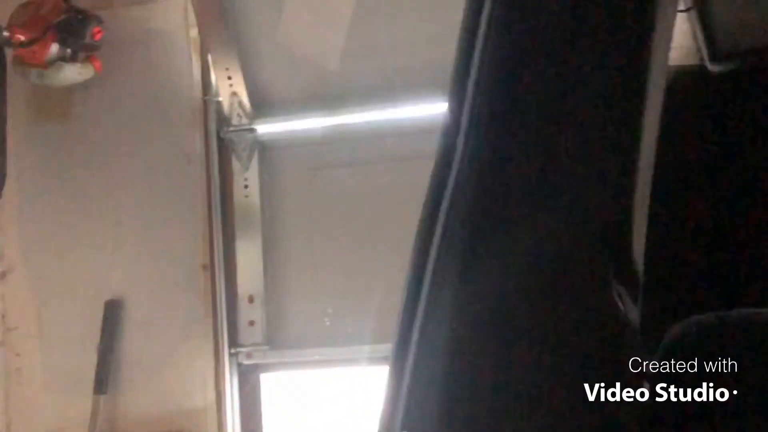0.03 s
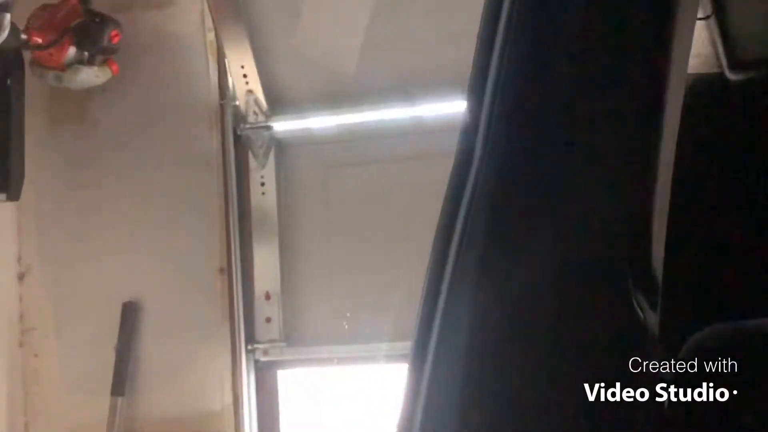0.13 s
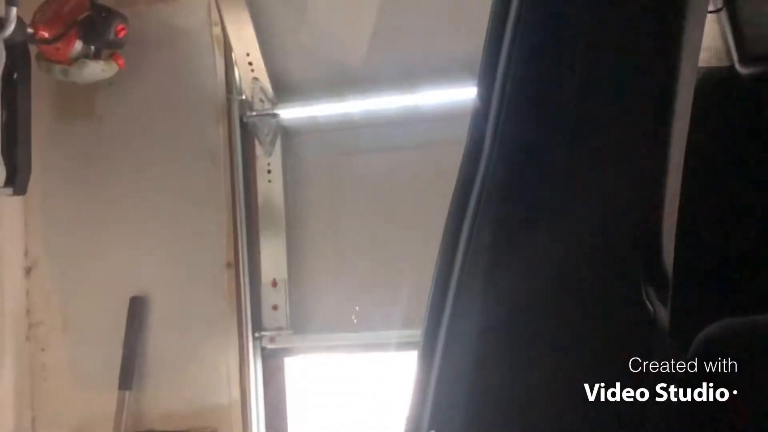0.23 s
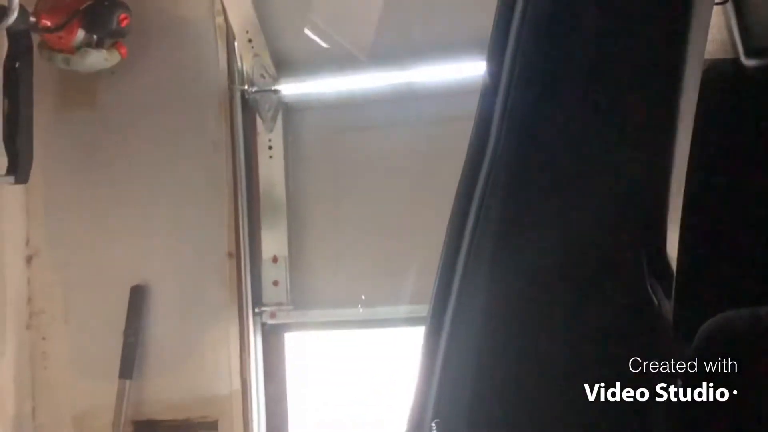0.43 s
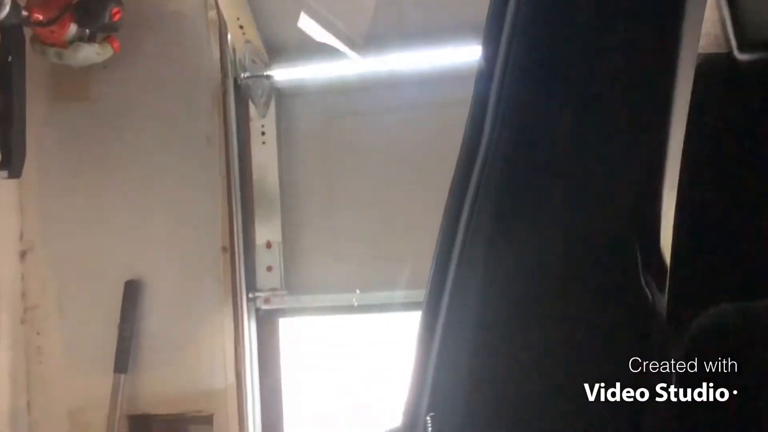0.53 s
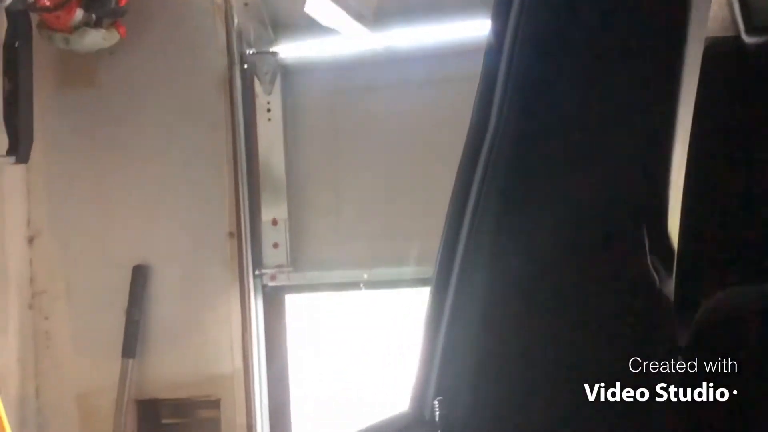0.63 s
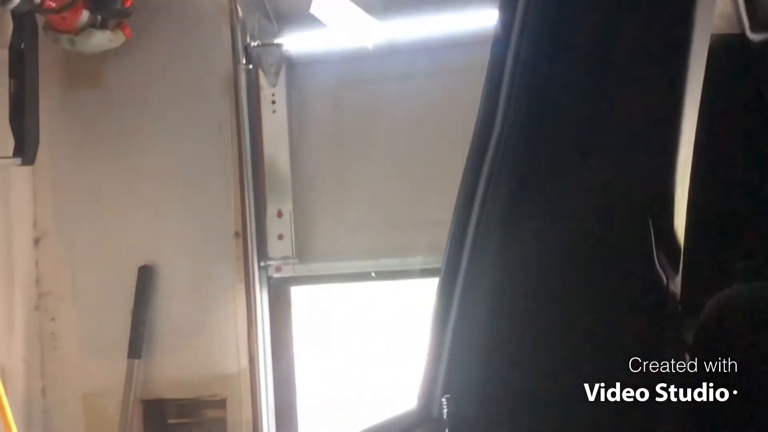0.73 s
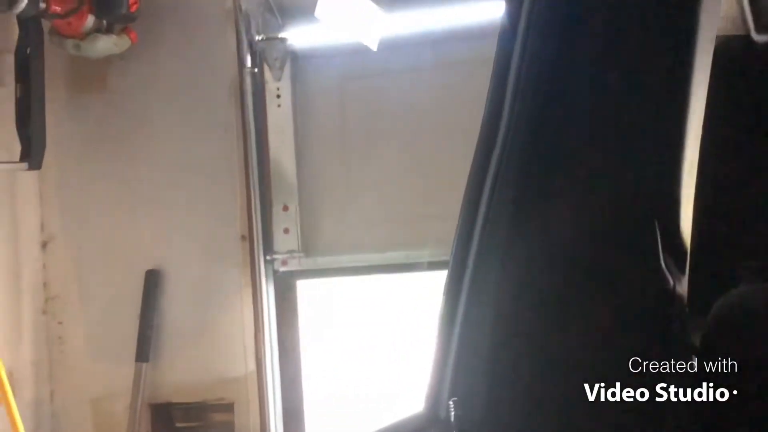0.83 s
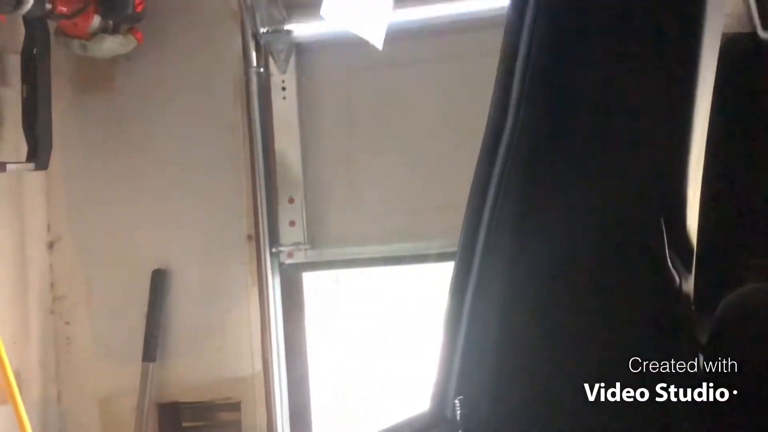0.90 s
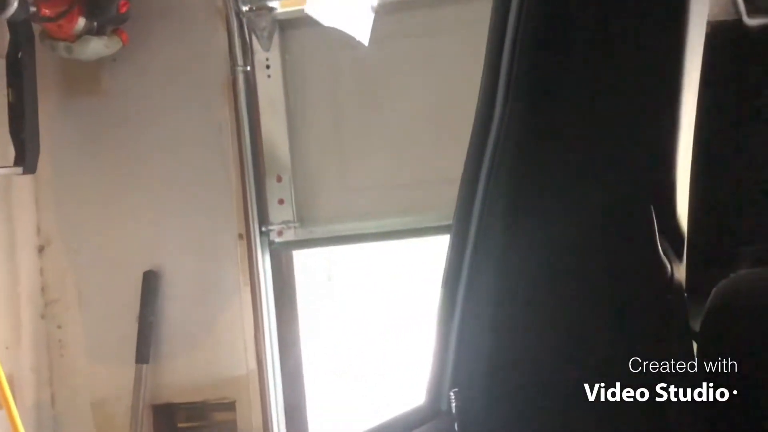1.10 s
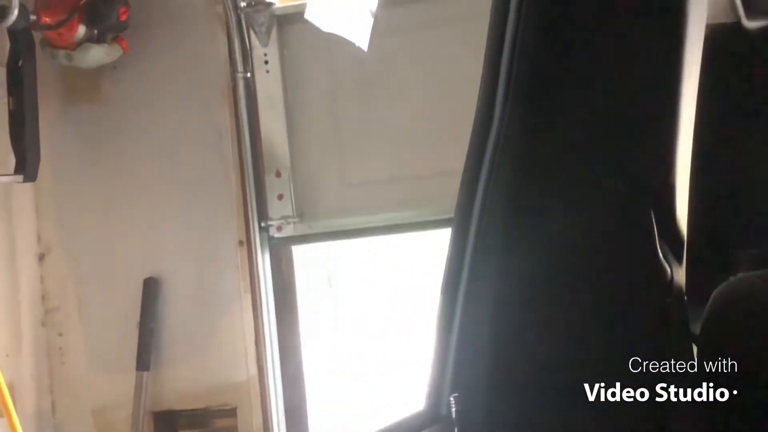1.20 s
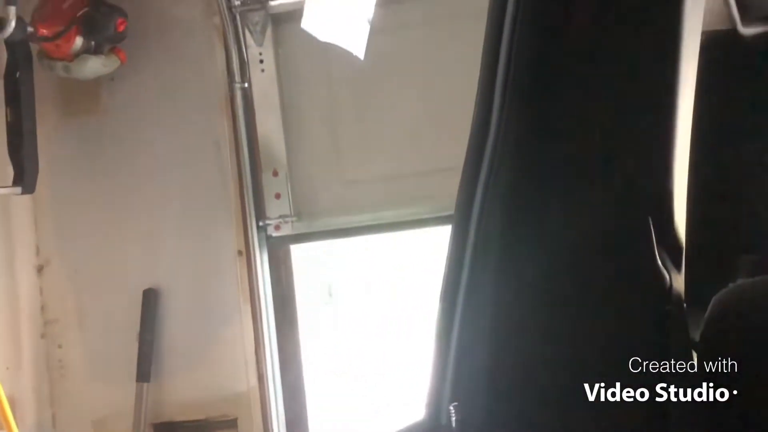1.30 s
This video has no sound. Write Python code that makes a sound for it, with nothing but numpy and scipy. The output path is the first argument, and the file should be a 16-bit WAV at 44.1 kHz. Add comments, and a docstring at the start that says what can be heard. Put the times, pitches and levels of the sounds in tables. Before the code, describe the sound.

A soft, hollow bump on a door panel comes at about 0.2 seconds, with a short scrape and a low boom that fades by 0.5 seconds. Faint scuffs and cloth rustles of someone shifting run until about 1.2 seconds, with two very faint, thin squeaks in the first 0.4 seconds. Two small taps land near 1.3 seconds. A quiet low rumble and even hiss fill the garage throughout.

```python
"""Low rumble and an even hiss in a quiet garage. One soft bump, with a short scrape of contact,
sets a hollow panel, perhaps a door, booming in a few quickly fading swells while its modes ring out.
Someone shifts: faint friction scuffs, cloth rustles and two thin stick-slip squeaks, with low room
resonances stirred by the movement. Two small taps come at the end."""
import sys
import numpy as np
from scipy import signal
from scipy.fft import irfft
from scipy.io import wavfile

SR = 44100
rng = np.random.default_rng(int(sys.argv[2]) if len(sys.argv) > 2 else 0)


def int16_out(signal):
    """Quantize to a 16-bit WAV file."""
    q = np.round(np.clip(np.atleast_2d(signal).T, -1, 1) * 32767)
    wavfile.write(sys.argv[1], SR, q.astype(np.int16))


N = 59535
T = np.arange(N) / SR
HZ = np.fft.rfftfreq(N, 1 / SR) + 1  # +1 keeps the log finite


def amp(db):
    """Decibels to gain."""
    return 10 ** (np.asarray(db) / 20)


def unit_rms(x):
    """Scale to rms 1."""
    return x / np.sqrt(np.mean(x ** 2) + 1e-20)


def spectrum_db(colour):
    """Join (freq_hz, relative_db) points on a log-frequency axis."""
    freq_hz, relative_db = np.transpose(colour)
    return np.interp(np.log(HZ), np.log(freq_hz), relative_db)


def noise(shape_db):
    """Random-phase noise of rms 1 with the given spectral shape."""
    phases = np.exp(2j * np.pi * rng.random(len(HZ)))
    return unit_rms(irfft(amp(shape_db) * phases, N))


def wander(rate_hz):
    """Random drift of rms 1, low-passed at rate_hz."""
    return noise(-10 * np.log10(1 + (HZ / rate_hz) ** 6))


def envelope(start_s, length_s, rise_s, decay_s):
    """Linear rise, hold, exponential decay."""
    rise = np.clip((T - start_s) / rise_s, 0, 1)
    return rise * np.exp(-np.maximum(T - start_s - length_s, 0) / decay_s)


def friction(strokes, colour, rise_s, decay_s, grain_db):
    """Strokes of rubbing noise, each with its own brightness; grain_db sets the level flutter."""
    out = np.zeros(N)
    for start_s, length_s, level_db, tilt_db_per_oct in strokes:
        hiss = noise(spectrum_db(colour) + tilt_db_per_oct * np.log2(HZ))
        grainy = unit_rms(hiss * amp(grain_db * wander(rate_hz=120)))
        out += amp(level_db) * envelope(start_s, length_s, rise_s, decay_s) * grainy
    return out


def room_tone():
    """Steady low murmur and hiss of the room."""
    # room spectrum: freq_hz, relative_db
    colour = [(22, -32.5), (45, -3), (68, -4.5), (110, 3), (190, 1), (290, -7), (400, -7.5), (540, -16),
              (800, -22.5), (1200, -25.5), (2000, -32), (2700, -31.5), (3300, -30.5), (4500, -33.5),
              (7000, -35), (15000, -39)]
    return amp(-60) * noise(spectrum_db(colour))


def rumble():
    """A deep tone that wavers in pitch and level."""
    # rumble contour: time_s, relative_db
    contour = [(0.0, -61), (0.326, -69), (0.398, -55.5), (0.54, -70.5), (0.586, -62), (0.634, -72),
               (0.702, -64), (0.804, -87), (0.98, -58.5), (1.35, -79)]
    pitch_hz = 47.04 + 4 * wander(rate_hz=9.5)
    level_db = np.interp(T, *np.transpose(contour)) - 4
    cycles = np.cumsum(pitch_hz) / SR
    return amp(level_db) * unit_rms(np.sin(2 * np.pi * cycles))


def room_resonances():
    """Low, slightly unsteady room resonances, stirred by movement, swell and die away."""
    # resonances: start_s, length_s, level_db, pitch_hz
    resonances = [(0, 0.034, -57.5, 183), (.372, 0.065, -50, 173.6), (.54, 0.024, -57.5, 175),
                  (0.549, 0.1, -64, 388.8), (.71, 0.069, -55, 184.7), (.85, 0.037, -64, 187),
                  (1.061, 0.047, -59.5, 199.6)]
    out = np.zeros(N)
    for start_s, length_s, level_db, pitch_hz in resonances:
        phase_rad = 2 * np.pi * pitch_hz * (T - start_s) + 0.35 * wander(rate_hz=30)
        swell = envelope(start_s, length_s, rise_s=0.0064, decay_s=0.02)
        out += amp(level_db) * swell * np.sin(phase_rad)
    return out


def rustles():
    """Cloth rubs lightly as someone shifts."""
    # cloth strokes: start_s, length_s, level_db, tilt_db_per_oct
    strokes = [(.04, 0.027, -70.5, -6.5), (.25, 0.12, -87, -5.5), (.542, 0.089, -83, -4),
               (.668, 0.018, -76, -2), (.845, 0.031, -81.5, 2), (.955, .02, -77, -5),
               (1.01, 0.028, -105, -7)]
    # cloth spectrum before tilt: freq_hz, relative_db
    colour = [(100, -36), (1500, -12), (2700, -13.5), (3350, -0.5), (4100, -4.5), (5500, -4.5), (7000, -20),
              (16000, -45)]
    return friction(strokes, colour, rise_s=0.0035, decay_s=0.014, grain_db=0)


def squeaks():
    """Thin stick-slip whistles of unsteady pitch."""
    # slips: start_s, length_s, level_db, pitch_hz
    slips = [(0.051, 0.019, -73.5, 3405), (0.286, .055, -83.5, 3190)]
    out = np.zeros(N)
    for start_s, length_s, level_db, pitch_hz in slips:
        jitter = 0.018 * wander(rate_hz=160)
        cycles = np.cumsum(pitch_hz * (1 + jitter)) / SR
        swell = envelope(start_s, length_s, rise_s=0.0085, decay_s=0.015)
        out += amp(level_db) * swell * np.sin(2 * np.pi * cycles)
    return out


def scuffs():
    """Dull friction of someone shifting."""
    # scuff strokes: start_s, length_s, level_db, tilt_db_per_oct
    strokes = [(.012, .11, -64.5, 1), (.285, .04, -58.5, -7.5), (.542, 0.075, -57.5, -1),
               (.625, 0.061, -60, -1), (.715, 0.1, -62.5, -2), (.825, 0.12, -63.5, -1.5),
               (.988, 0.059, -63, 2.5), (1.07, 0.043, -69, 2), (1.168, 0.013, -68.5, 0.5)]
    # scuff spectrum before tilt: freq_hz, relative_db
    colour = [(50, -42), (130, -7.5), (200, 6.5), (390, 0), (550, -9.5), (740, -10), (1300, -20.5),
              (2200, -26.5), (3400, -32.5), (5500, -37.5), (7500, -47), (16000, -57)]
    return friction(strokes, colour, rise_s=0.0043, decay_s=0.022, grain_db=0.5)


def taps():
    """Small knocks: each a dry tick and one quickly damped mode."""
    # knocks: start_s, ring_db, ring_hz, tick_db
    knocks = [(1.2595, -63, 1260, -61.5), (1.3012, -55.5, 500, -61)]
    # tick spectrum: freq_hz, relative_db
    colour = [(60, -25), (400, -3), (800, 0), (1400, -2), (1900, -11), (2350, -7), (3200, -20), (6000, -21),
              (16000, -45)]
    ring_t60_s = 0.042
    out = np.zeros(N)
    for start_s, ring_db, ring_hz, tick_db in knocks:
        age_s = np.maximum(T - start_s, 0)
        out += amp(ring_db - 60 * age_s / ring_t60_s) * np.sin(2 * np.pi * ring_hz * age_s)
        burst = envelope(start_s, length_s=0.0015, rise_s=0.0015, decay_s=0.0055)
        out += amp(tick_db) * burst * noise(spectrum_db(colour))
    return out


def contact_scrape():
    """Grainy friction of the contact that bumps the panel."""
    # scrape strokes: start_s, length_s, level_db, tilt_db_per_oct
    strokes = [(.189, 0.024, -60.5, -1), (.202, 0.033, -53, .3), (.251, 0.026, -58.5, -1)]
    # scrape spectrum before tilt: freq_hz, relative_db
    colour = [(100, -32), (230, 3), (420, -0.5), (600, -12), (780, -11), (1400, -20.5), (2100, -27.5),
              (2850, -29.5), (3250, -24.5), (4200, -27), (5600, -28.5), (7200, -43.5), (16000, -58)]
    return friction(strokes, colour, rise_s=0.0017, decay_s=0.026, grain_db=2)


def panel_bump():
    """The hollow panel's lowest mode throbs in rounded swells while its modes ring out."""
    # boom swells: start_s, length_s, level_db
    swells = [(0.176, 0.01, -48.5), (0.201, 0.017, -37.5), (0.215, 0.0223, -33.5), (.264, 0.031, -36.5),
              (0.313, 0.028, -47), (0.349, 0.018, -53)]
    # panel modes: pitch_hz, level_db, t60_s
    modes = [(155.8, -51.5, 0.81), (253.4, -41.5, 0.094), (320.7, -51, 0.32), (730, -63, 0.31),
             (944, -88, .2)]
    bump_s, ring_rise_s = 0.1995, 0.0041
    boom_hz, swell_rise_s, swell_fall_s = 158, 0.014, 0.018
    power = np.zeros(N)
    for start_s, length_s, level_db in swells:
        rise = (T - start_s) / swell_rise_s
        fall = 1 - (T - start_s - length_s) / swell_fall_s
        ramp = np.clip(np.minimum(rise, fall), 0, 1)
        power += (amp(level_db) * np.sin(np.pi / 2 * ramp)) ** 2
    boom = np.sqrt(power) * np.sin(2 * np.pi * boom_hz * (T - bump_s))
    age_s = np.maximum(T - bump_s, 0)
    ring = sum(amp(level_db - 60 * age_s / t60_s) * np.sin(2 * np.pi * pitch_hz * age_s)
               for pitch_hz, level_db, t60_s in modes)
    return boom + ring * np.clip(age_s / ring_rise_s, 0, 1)


def scene():
    """All sources summed to mono."""
    bump = panel_bump() + contact_scrape()
    shifting = scuffs() + rustles()
    background = rumble() + room_tone()
    return (background + shifting + squeaks() + taps() + room_resonances() + bump)[None]


def record(dry):
    """Steep low-pass on the top treble."""
    cutoff_hz = 15650
    lowpass = signal.firwin(511, cutoff_hz, window=("kaiser", 9), fs=SR)
    return signal.oaconvolve(dry, lowpass[None], "same")


dry = scene()
out = record(dry)
int16_out(out)
```